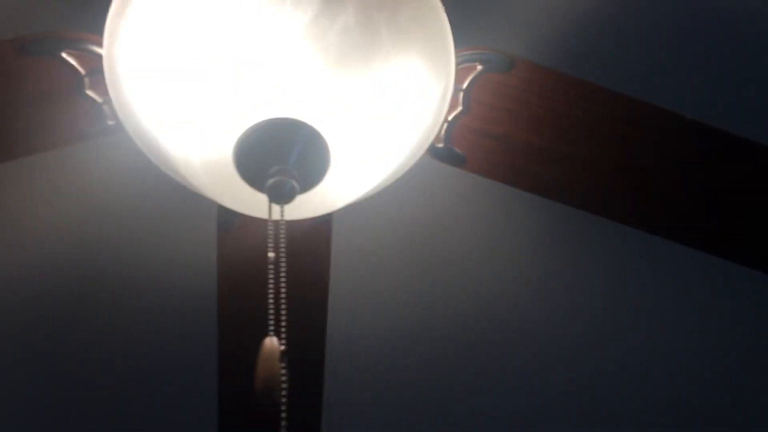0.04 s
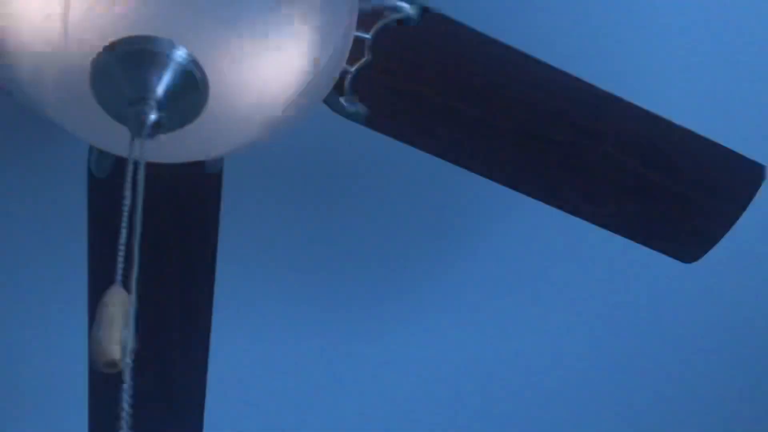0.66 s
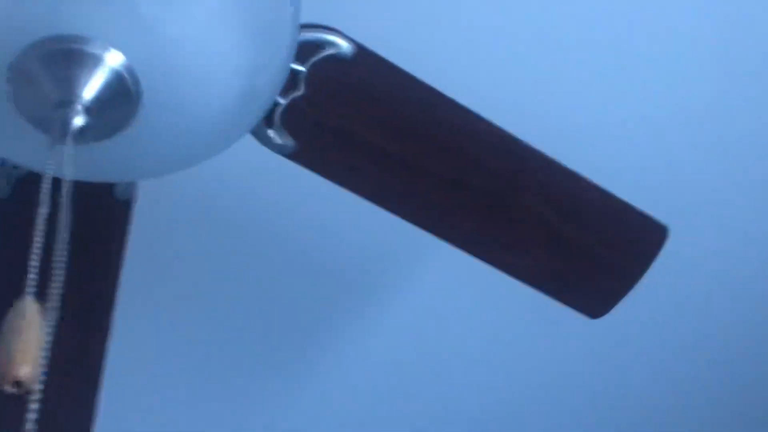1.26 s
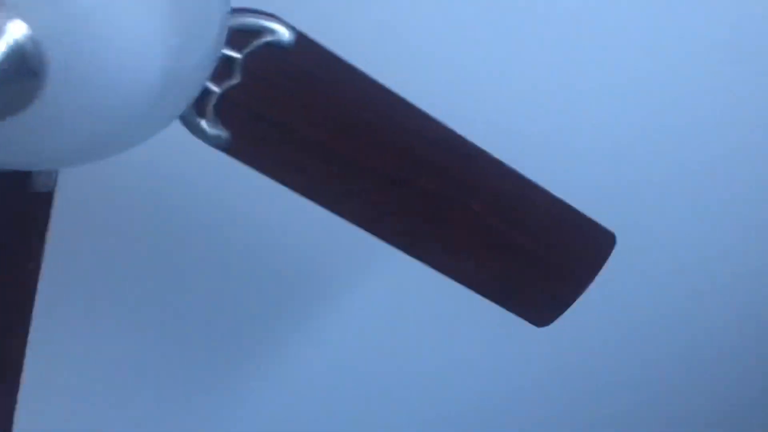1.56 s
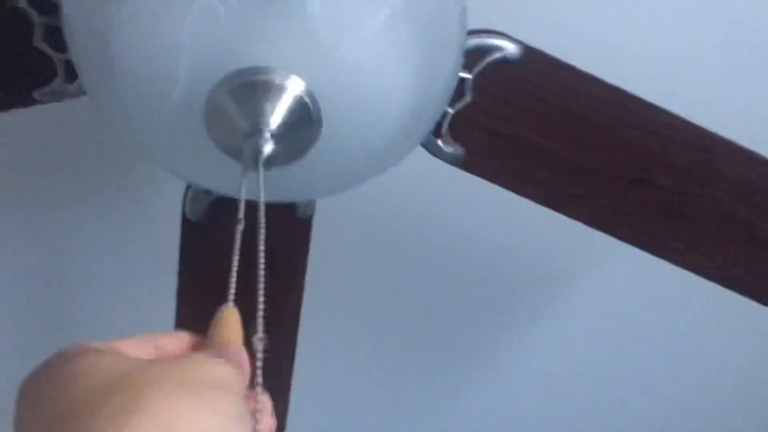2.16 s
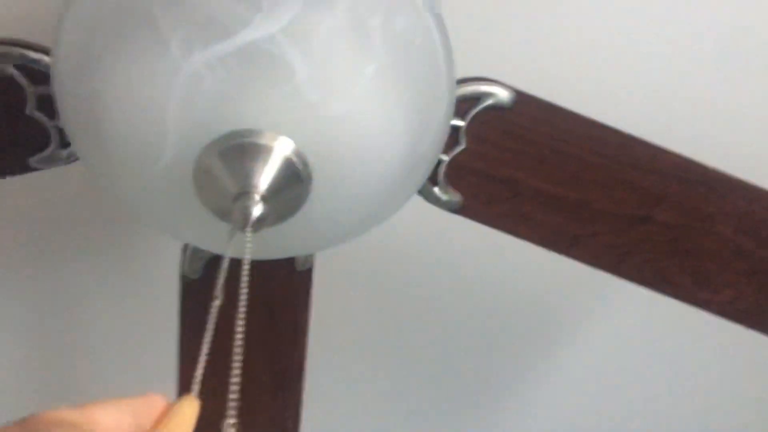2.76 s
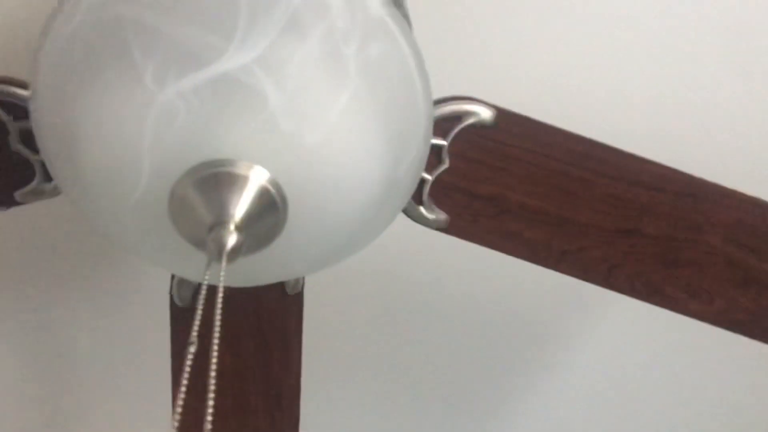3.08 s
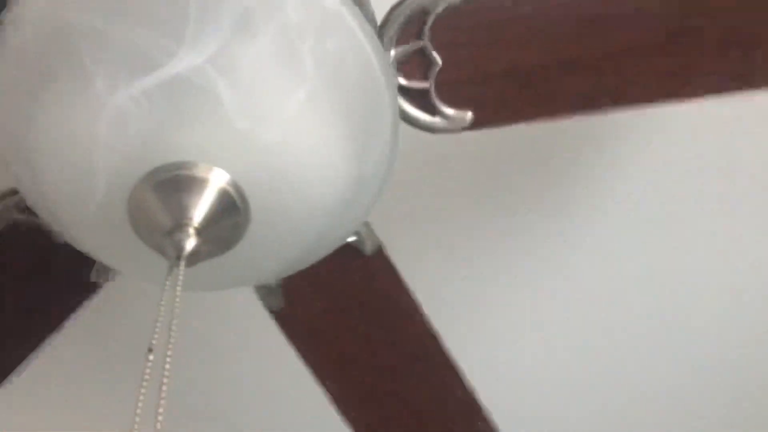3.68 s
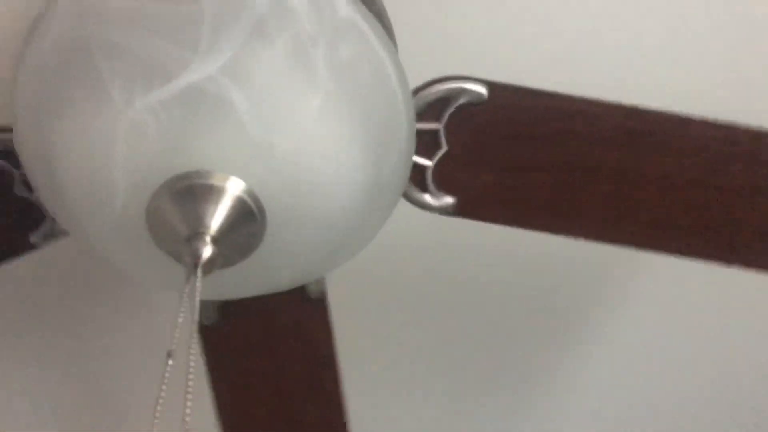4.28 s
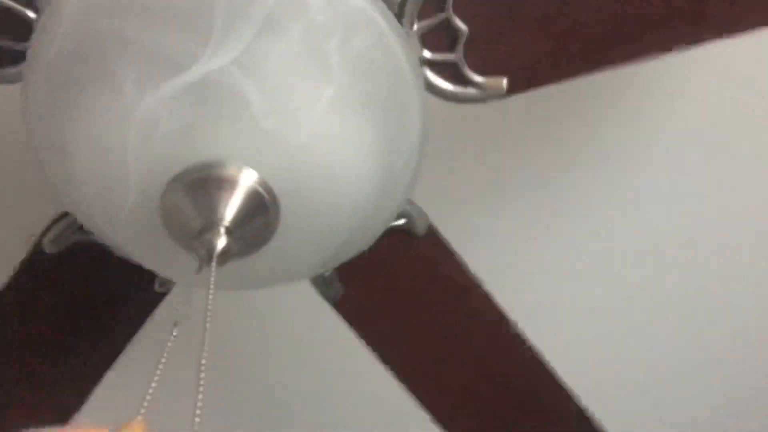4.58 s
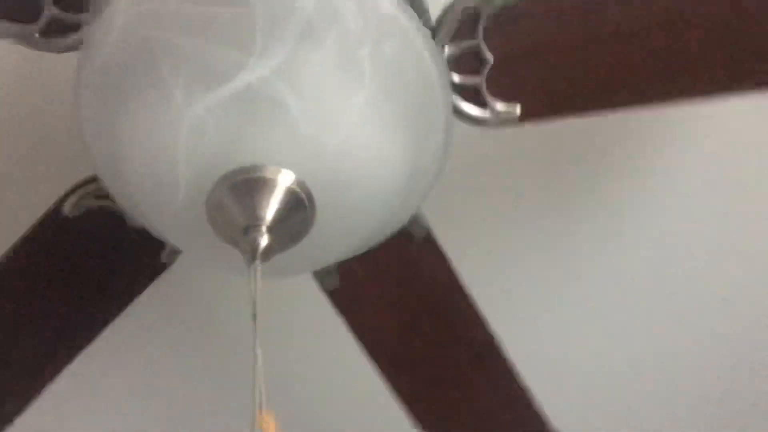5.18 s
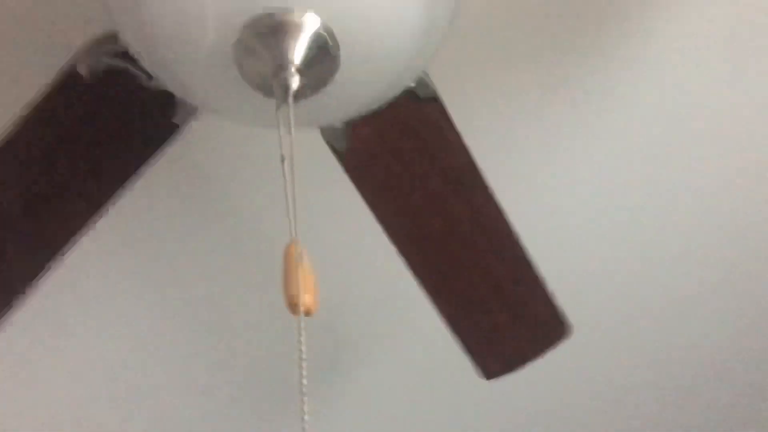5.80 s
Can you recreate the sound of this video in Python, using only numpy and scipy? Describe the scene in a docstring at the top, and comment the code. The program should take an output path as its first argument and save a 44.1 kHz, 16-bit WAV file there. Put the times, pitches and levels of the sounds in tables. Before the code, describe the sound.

A ceiling fan gives a faint, dry electric buzz in a small room, heard from just below on a hand-held microphone that rumbles and bumps. Its lamp switch clacks softly. Then the bead chain is drawn taut, the hollow housing creaks and knocks, and the buzz stops. The pull switch snaps twice with a bright metallic ring, with small ratchet clicks in between. A sleeve rustles faintly at the end.

```python
"""A ceiling fan in a small room, heard from a hand-held camera just below it. A dry electric buzz ticks
39 times a second over faint room air, while the hand rumbles and fingers bump the camera's case.
The lamp goes out with a clack. A hand draws the bead chain taut, and the hollow housing creaks and
knocks. The buzz stops, and the pull switch snaps and rings through two pulls.
Last, a sleeve rustles softly in the still room."""
import sys
import numpy as np
from scipy import signal
from scipy.fft import rfft, irfft, next_fast_len
from scipy.io import wavfile
from scipy.ndimage import uniform_filter1d, map_coordinates

SR = 44100
rng = np.random.default_rng(int(sys.argv[2]) if len(sys.argv) > 2 else 0)


def transcribe(u):
    """Save the signal u as a 16-bit wav file named by the first command-line argument.

    u: samples, shape (n,) or (channels, n), limited to [-1, 1]; the rate is SR.
    q: integer samples, one column per channel.
    """
    v = np.clip(np.atleast_2d(u).T, -1, 1)
    q = np.round(v * 32767).astype(np.int16)
    wavfile.write(sys.argv[1], SR, q)


N = 266628
T = np.arange(N) / SR
SHOT_T = T[:SR * 2 // 3]  # time axis of a one-shot

# Levels in the tables are relative: each layer adds its own trim.
# noise colours of the bed (f/Hz, level/dB)
AIR_EQ = [(60, -6), (130, -2.5), (300, -5.5), (700, -16), (1500, -14.5), (3000, -20), (4500, -25),
          (9500, -26.5), (10600, -29.5), (16000, -31.5)]  # still room and microphone hiss
SWAY_EQ = [(20, -24.5), (32, -3.5), (44, 16.5), (65, 17), (90, -7), (160, -50)]  # the hand's slow sway
RUMBLE_EQ = [(45, -29), (75, -1), (115, 5), (170, -7), (260, -16), (600, -61.5)]  # the grip's rumble
RUB_EQ = [(120, -10.5), (220, 4), (400, 2), (720, -1), (1100, -4.5), (2000, -26), (4000, -55)]  # skin on the case
WHIR_EQ = [(100, 11.5), (250, 4), (550, 6), (900, 6), (1300, -1.5), (2400, 0), (3300, -27), (5000, -38),
           (6500, -12.5), (9700, -20), (10600, -51), (16000, -56)]  # the whir under the buzz
# how restlessly the hand holds the camera (t/s, level/dB)
GRIP_CURVE = [(0.0, -54), (0.71, -51), (1.33, -61), (1.63, -53.5), (2.34, -58.5), (2.52, -49.5),
              (2.81, -52), (3.13, -53.5), (3.59, -51.5), (3.94, -61), (4.16, -59.5), (4.46, -50),
              (4.88, -64), (6.05, -65.5)]
# partials of one buzz tick (f/Hz, level/dB, time to peak/s)
TICK_PARTIALS = [(348, -56, 0.00345), (492, -55.5, 0.00257), (890, -65.5, 0.00214), (1030, -56, 0.00241),
                 (1678, -57.5, 0.002023), (1823, -51, 0.001864), (2208, -52.5, 0.00211),
                 (2330, -55, 0.002001), (2990, -72.5, 0.00202)]

# fingers on the camera (t/s, level/dB, hardness: 0 = soft pad .. 1 = hard tap)
BUMP_CUES = [(.053, -49.5, 0.47), (.294, -39, 0.84), (.547, -42.5, 0.23), (.668, -42.5, 0.78),
             (.682, -44.5, .9), (.749, -46.5, .2), (1.433, -54, 0.79), (1.789, -35, 1), (1.887, -46, 0.95),
             (1.992, -46, 0.87), (2.07, -52.5, 0.76), (2.11, -45.5, 0.14), (2.331, -36, 0.96),
             (2.356, -39.5, 0.79), (2.47, -39, 0.79), (2.592, -41, 0.96), (2.749, -45.5, 1),
             (3.157, -41.5, 1), (3.352, -49.5, 0.66), (3.49, -49, 1), (3.638, -41.5, 0.9), (4.238, -51, 1),
             (4.294, -50, 0.88), (4.46, -55.5, .1)]
# colour of a finger's first touch (f/Hz, level/dB)
TOUCH_EQ = [(500, 7.5), (950, 2.5), (1300, -7), (2000, -4), (2800, -21), (4000, -74), (8000, -82)]
# modes of the camera's case, from sharpest knock to slowest flex (f/Hz, level/dB, t60/s)
KNOCK_MODES = [(385, -5, 0.037), (480, 3.7, 0.012), (677, 3.5, 0.023), (786, 1.2, 0.017)]
THUD_MODES = [(156, 4.1, 0.033), (250, 0.88, 0.03)]
BOOM_MODES = [(56.6, -1.5, 0.33), (93, 17, 0.059)]

# clacks as the lamp goes out, then chain tugs (t/s, body level/dB, rattle level/dB, tick level/dB)
KNOCK_CUES = [(.416, -52.5, -54.5, -85), (.703, -49, -50.5, -49.5), (0.887, -40, -38.5, -52),
              (2.872, -43, -51, -71), (2.932, -39.5, -44.5, -55.5), (2.966, -42.5, -62, -73),
              (3.12, -47.5, -62, -74), (3.147, -51, -54, -59), (3.171, -40, -35.5, -66),
              (3.186, -44, -44.5, -67), (3.587, -37, -46, -64.5), (3.638, -42, -43, -54)]
# colours of a knock (f/Hz, level/dB)
BODY_EQ = [(200, -10), (450, -13.5), (570, 2.5), (670, -5.5), (770, 4), (950, -6.5), (1300, -15),
           (2500, -59)]  # the hollow housing
RATTLE_EQ = [(600, -26.5), (1000, -5.5), (1230, 11.5), (1500, 4), (1800, 0.5), (2100, -0.5), (2500, 3.5),
             (3000, -18.5), (4700, -37.5), (8000, -33), (14000, -62.5)]  # its loose parts
BRIGHT_TICK_EQ = [(3000, -20), (4400, -23.5), (5200, -17.5), (6400, -2), (7300, 1.5), (8300, -3.5), (9600, -5.5),
                  (11000, -20.5), (14000, -21), (16000, -37)]  # a bright tick on each clack and tug
# the small room's reverb decay (f/Hz, t60/s)
ROOM_DECAY = [(150, 0.12), (700, 0.52), (2500, 0.55), (5500, 0.55), (9000, 0.43), (15000, 0.31)]
# the taut chain creaks in its guide and in the switch (t/s, length/s, f/Hz, level/dB)
CREAK_CUES = [(2.768, 0.061, 576, -44), (2.872, 0.0093, 710, -35.5), (2.933, 0.01, 655, -31),
              (3.583, 0.008, 1850, -32.5), (3.884, 0.011, 1182, -33), (4.23, 0.024, 555, -43.5),
              (4.297, 0.015, 554, -42)]

# the slack chain brushes the switch (t/s, level/dB)
JINGLE_CUES = [(3.769, -56.5), (3.8334, -60), (4.0638, -56), (4.9097, -68.5)]
# the chain is let go and the switch springs back
# (t/s, level/dB, chain still drawn 0..1, rebound delay/s, rebound level/dB)
RELEASE_CUES = [(3.8598, -18.5, 0.09, .0257, -27), (4.5094, -18.5, 0.44, .0333, -30.5)]
# the chain is drawn and the pawl climbs its ratchet (t/s, click level/dB, housing body level/dB)
PAWL_CUES = [(4.168, -43, -46.5), (4.189, -45.5, -55), (4.232, -41, -43), (4.2377, -32, -44.5),
             (4.2939, -25, -42.5)]
# the switch's metal ring (f/Hz, level springing back/dB, level being drawn/dB, t60/s)
SWITCH_MODES = [(4250, -32, -20, .16), (4324, -31, -16.5, .38), (5222, -18, -28, .36),
                (5360, -15, -16, .22), (5575, -16, -26, .31), (6390, -25, -13, .15), (6870, -23, -10, .16),
                (7110, -13, -11, .21), (7278, -14, -24, .2), (7385, -14, -26, .26), (7452, -13, -26, .32),
                (7540, -18, -22, .36), (8382, -11.5, -21, .42), (8600, -19, -24, .22), (9432, -14, -9, .2),
                (9800, -27, -21, .15), (11100, -26, -14, .16), (12070, -19, -23, .3),
                (12208, -13.5, -21, .34), (12770, -25, -16, .2), (13370, -19, -15, .2)]
# ratchet clatter, springing back and being drawn (f/Hz, level/dB)
SPRING_BACK_EQ = [(2800, -33), (3800, -20.5), (4900, -15), (5400, 4.5), (6000, -20), (7300, 7.5),
                  (8000, -10), (8550, -0.5), (9050, -10), (9450, -6), (10400, -25.5), (12200, -5),
                  (14400, -15), (15800, -14.5)]
DRAWN_EQ = [(2800, -16.5), (4000, -17.5), (4900, -20.5), (5400, -5), (5900, -15), (6900, -6), (7800, -9),
            (9450, -6.5), (10400, -14), (11200, -7.5), (13400, -10), (15800, -11.5)]

# sleeve strokes (t/s, level/dB, low-pass f/Hz)
SLEEVE_CUES = [(5.475, -59.5, 10600), (5.63, -58.5, 4960), (5.7, -54.5, 6430), (5.77, -54.5, 2036),
               (5.865, -59.5, 6420), (5.987, -53, 11700)]
# colour of brushed cloth (f/Hz, level/dB)
CLOTH_EQ = [(200, -18), (450, -8), (1100, -0.5), (2600, -6.5), (4000, -9.5), (6000, -6.5), (9200, -6),
            (11000, -12), (15500, -5)]

MAINS_HZ, TOP_HZ = 120, 15750
BUZZ_RATE_HZ, BUZZ_START_S, BUZZ_END_S = 39.172, .0087, 3.775
HARD_KNOCK_DB, SOFT_LOSS_DB = 13.5, 20  # a hard tap's extra knock; what a soft pad takes off
SLIP_LEAD_S, SLIP_DB = .0085, -22  # the pawl slips just ahead of each snap, and softer
JINGLE_T60_S, PAWL_T60_S, SNAP_T60_S, REBOUND_T60_S = .083, .034, .028, .0095
KNOCK_T60_S, PAWL_KNOCK_T60_S = .1, .065
PAWL_RATTLE_DB = -18.5  # the housing's rattle follows the click's level
# a release jolts the housing (body level/dB, rattle level/dB, t60/s)
SNAP_JOLT, REBOUND_JOLT = (-46.5, -47, .18), (-44.5, -39, .14)


def amp(db):
    """Decibels to gain."""
    return 10 ** (np.asarray(db) / 20)


def along(points, hz):
    """Read a curve of (f/Hz, value) points on a log frequency axis."""
    freqs, values = np.transpose(points)
    return np.interp(np.log(hz + 1), np.log(freqs), values)


def noise(eq, size=len(SHOT_T)):
    """Coloured noise of rms 1, by default as long as a one-shot."""
    gain = amp(along(eq, np.fft.rfftfreq(size, 1 / SR)))
    coloured = irfft(rfft(rng.standard_normal(size)) * gain, size)
    return coloured / np.sqrt(np.mean(coloured ** 2) + 1e-20)


def wobble(rate_hz):
    """A smooth random modulator."""
    knots = rng.standard_normal(int(N * rate_hz / SR) + 4)
    return map_coordinates(knots, [T * rate_hz])


def fade(t60_s, attack_s):
    """Envelope of a hit: a quick rise and an exponential decay."""
    return amp(-60 * SHOT_T / t60_s) * (1 - np.exp(-SHOT_T / attack_s))


def partial(hz, width_hz):
    """A tone whose phase drifts, as loose metal parts shift against each other."""
    jitter = uniform_filter1d(rng.standard_normal(len(SHOT_T)), size=64)
    drift = np.cumsum(jitter) * np.sqrt(2 * np.pi * width_hz / SR)
    return np.sin(2 * np.pi * (hz * SHOT_T + rng.random()) + drift)


def add(track, s, sound):
    """Mix a sound into a track at s seconds."""
    part = track[max(round(s * SR), 0):][:len(sound)]
    part += sound[:len(part)]


def in_room(sound, wet_db, build_s):
    """A one-shot plus the walls' reverb, which builds up and lasts longest in the mids."""
    hz, t, spectrum = signal.stft(rng.standard_normal(len(SHOT_T)), SR, nperseg=256)
    decay = amp(-60 * t / along(ROOM_DECAY, hz)[:, None])
    tail = signal.istft(spectrum * decay, SR, nperseg=256)[1][:len(SHOT_T)]
    tail *= 1 - np.exp(-SHOT_T / build_s)
    wet = signal.fftconvolve(sound, tail / np.linalg.norm(tail))[:len(sound)]
    return sound + amp(wet_db) * wet


def room_tone():
    """Still air and a faint, wavering mains hum."""
    hum = amp(-72 + 1.5 * wobble(3)) * np.sin(2 * np.pi * MAINS_HZ * T)
    return hum + amp(-69) * noise(AIR_EQ, N)


def handling():
    """One restless grip drives slow sway, rumble and an uneven rub of skin on the case."""
    grip_db = np.interp(T, *np.transpose(GRIP_CURVE))
    restless_db = grip_db - grip_db.mean()
    flutter = wobble(20)
    sway = amp(-1 + 1.1 * restless_db) * noise(SWAY_EQ, N)  # swings wider than the grip
    rumble = amp(-1 + restless_db + 2.2 * flutter) * noise(RUMBLE_EQ, N)
    rub = amp(-15 + restless_db + 1.6 * flutter + 1.4 * wobble(70)) * noise(RUB_EQ, N)
    return amp(grip_db.mean()) * (sway + rumble + rub)


def fan_buzz():
    """Evenly spaced, nearly identical electric ticks over a soft whir; both stop together."""
    t = T[:SR // 20]
    tick = np.zeros(len(t))
    for hz, db, peak_s in TICK_PARTIALS:
        swell = (t / peak_s * np.exp(1 - t / peak_s)) ** 2
        tick += amp(db) * swell * np.sin(2 * np.pi * hz * (t - peak_s))
    track = np.zeros(N)
    for s in np.arange(BUZZ_START_S, BUZZ_END_S, 1 / BUZZ_RATE_HZ):
        add(track, s, tick * amp(rng.normal(0, .57)))
    gate = np.clip((BUZZ_END_S - T) / .032, 0, 1)
    return track + gate * amp(-67) * noise(WHIR_EQ, N)


def case_ring(modes, attack_s):
    """The camera's case rings at slightly different pitches wherever it is touched."""
    ring = np.zeros(len(SHOT_T))
    for k, (hz, db, t60) in enumerate(modes):
        gain = (-1) ** k * amp(db + rng.normal(0, .24))  # neighbouring modes in opposite polarity
        detuned_hz = hz * np.exp(rng.normal(0, .06))
        ring += gain * fade(t60, attack_s) * np.sin(2 * np.pi * detuned_hz * SHOT_T)
    return ring


def finger_bumps():
    """Bumps reach the microphone through the case, so they stay dry; harder touches knock more."""
    track = np.zeros(N)
    for s, db, hardness in BUMP_CUES:
        knock_db = db + HARD_KNOCK_DB - SOFT_LOSS_DB * (1 - hardness)
        touch = amp(knock_db - 8) * noise(TOUCH_EQ) * fade(t60_s=.033, attack_s=.0014)
        knock = amp(knock_db + 2) * case_ring(KNOCK_MODES, attack_s=.0049)
        thud = amp(db + 5) * case_ring(THUD_MODES, attack_s=.0014)
        boom = amp(db + 1.5) * case_ring(BOOM_MODES, attack_s=.0097)
        add(track, s, touch + knock + thud + boom)
    return track


def housing_jolts():
    """Every knock, pawl click, snap and rebound as (t/s, body level/dB, rattle level/dB, t60/s)."""
    cues = [(s, body_db, rattle_db, KNOCK_T60_S) for s, body_db, rattle_db, _ in KNOCK_CUES]
    cues += [(s, body_db, db + PAWL_RATTLE_DB, PAWL_KNOCK_T60_S) for s, db, body_db in PAWL_CUES]
    for s, _, _, delay, _ in RELEASE_CUES:
        cues += [(s, *SNAP_JOLT), (s + delay, *REBOUND_JOLT)]
    return cues


def housing_knocks():
    """Each jolt knocks the hollow housing and rattles its loose parts, with plenty of room on it."""
    track = np.zeros(N)
    for s, body_db, rattle_db, t60 in housing_jolts():
        body = amp(body_db) * noise(BODY_EQ)
        rattle = amp(rattle_db) * noise(RATTLE_EQ)
        knock = amp(.5) * (body + rattle) * fade(t60, attack_s=.0017)
        add(track, s, in_room(knock, wet_db=-3, build_s=.0074))
    return track


def bright_ticks():
    """A short, bright hiss with no clear ring tops each clack and tug."""
    track = np.zeros(N)
    for s, _, _, db in KNOCK_CUES:
        tick = amp(db + 3.5) * noise(BRIGHT_TICK_EQ) * fade(t60_s=.075, attack_s=.0006)
        add(track, s, in_room(tick, wet_db=-5.5, build_s=.005))
    return track


def chain_creaks():
    """Brief stick-slip tones as the chain tightens."""
    track = np.zeros(N)
    for s, length, hz, db in CREAK_CUES:
        progress = np.minimum(SHOT_T / length, 1)
        swell = np.sqrt(np.abs(np.sin(np.pi * progress)))
        creak = amp(db) * swell * partial(hz, width_hz=5.6)
        add(track, s, in_room(creak, wet_db=-10.5, build_s=.0041))
    return track


def switch_contacts():
    """Hits in the switch as (t/s, level/dB, 0 = springing back .. 1 = being drawn, t60/s)."""
    cues = [(s, db, 1, PAWL_T60_S) for s, db, _ in PAWL_CUES]
    cues += [(s, db, 0, JINGLE_T60_S) for s, db in JINGLE_CUES]
    for s, db, drawn, delay, rebound_db in RELEASE_CUES:
        slip = (s - SLIP_LEAD_S, db + SLIP_DB, 1, PAWL_T60_S)
        snap = (s, db, drawn, SNAP_T60_S)
        rebound = (s + delay, rebound_db, drawn, REBOUND_T60_S)
        cues += [slip, snap, rebound]
    return cues


def pull_switch():
    """Each contact is a burst of ratchet clatter and a metal ring, coloured by how the chain moves."""
    track = np.zeros(N)
    for s, db, drawn, t60 in switch_contacts():
        clatter = np.sqrt(1 - drawn) * noise(SPRING_BACK_EQ) + np.sqrt(drawn) * noise(DRAWN_EQ)
        drive = np.minimum(amp(5.5) * fade(t60, attack_s=.00024), 1)  # holds while the beads run
        ring = np.zeros(len(SHOT_T))
        for hz, back_db, drawn_db, ring_t60 in SWITCH_MODES:
            mode_db = back_db + drawn * (drawn_db - back_db) + rng.normal(0, 1)
            envelope = fade(ring_t60, attack_s=.00082) + 2.1 * drive  # driven, then ringing freely
            ring += amp(mode_db) * envelope * partial(hz, width_hz=2 / ring_t60)
        burst = in_room(amp(-2) * clatter * drive, wet_db=-4.5, build_s=.0031)
        add(track, s, amp(db) * (burst + amp(-3.5) * ring))
    return track


def sleeve_rustle():
    """Soft brushes of cloth, each with its own low-pass: bright for a quick stroke, dull for a slow."""
    track = np.zeros(N)
    for s, db, cutoff_hz in SLEEVE_CUES:
        lowpass = signal.butter(3, cutoff_hz, fs=SR, output="sos")
        brush = signal.sosfilt(lowpass, noise(CLOTH_EQ))
        add(track, s, amp(db) * brush * fade(t60_s=.55, attack_s=.0051))
    return track


def scene():
    """The mono mix of all layers at the camera's microphone."""
    bed = room_tone() + handling() + fan_buzz()
    hits = finger_bumps() + housing_knocks() + bright_ticks() + chain_creaks() + pull_switch()
    return (bed + hits + sleeve_rustle())[None]


def record(dry):
    """The camera's bandwidth: a brick-wall top and a 25 Hz low cut."""
    size = next_fast_len(N + SR // 2)
    hz = np.fft.rfftfreq(size, 1 / SR)
    high_cut = 1 / np.sqrt(1 + (hz / TOP_HZ) ** 160)
    band = irfft(rfft(dry, size) * high_cut, size)[:, :N]
    low_cut = signal.butter(2, 25, "highpass", fs=SR, output="sos")
    return signal.sosfilt(low_cut, band)


dry = scene()
out = record(dry)
transcribe(out)
```